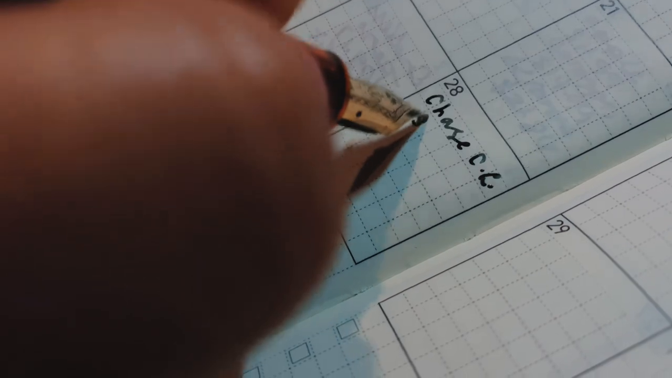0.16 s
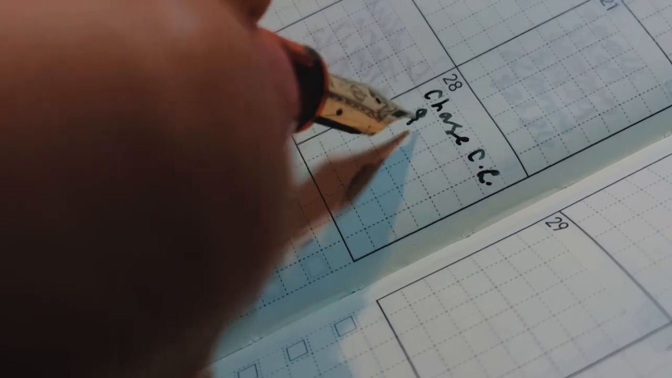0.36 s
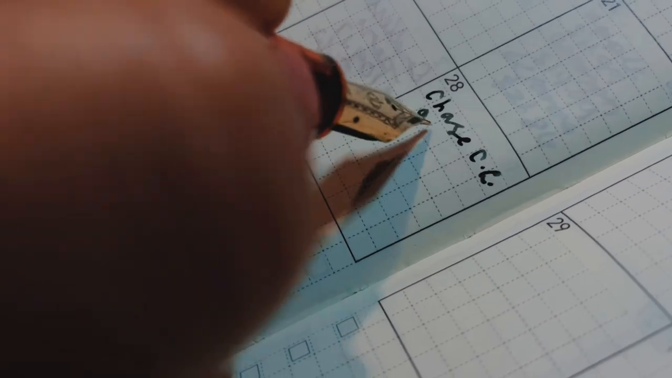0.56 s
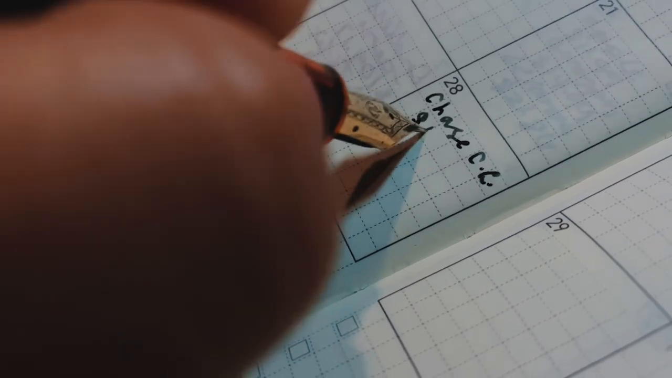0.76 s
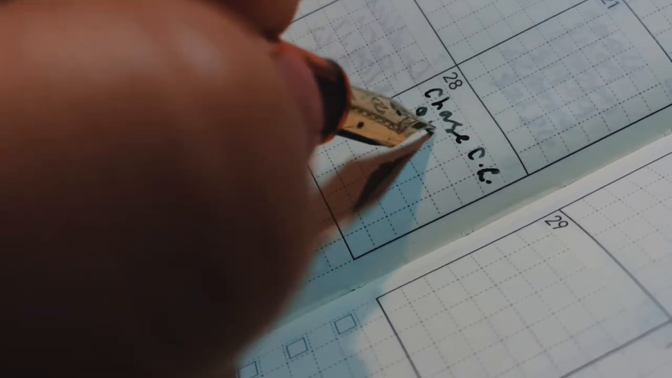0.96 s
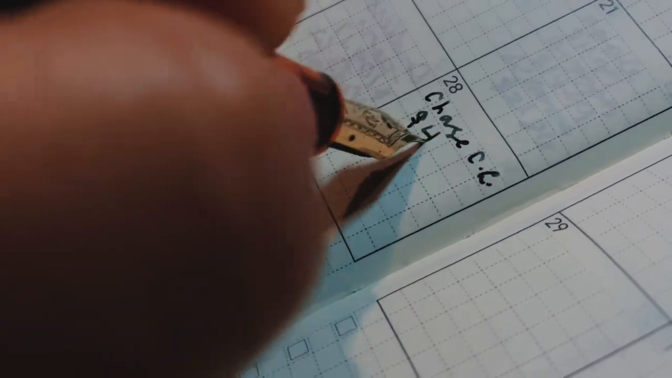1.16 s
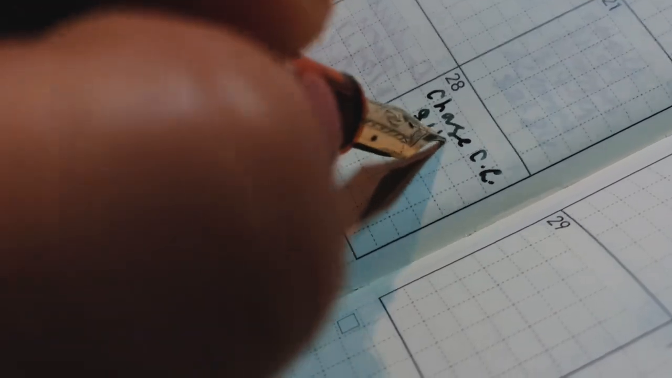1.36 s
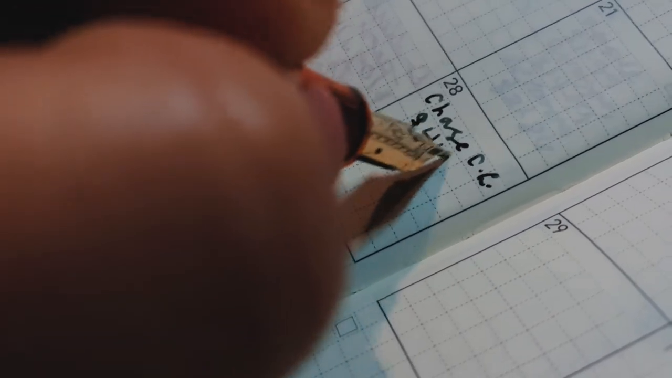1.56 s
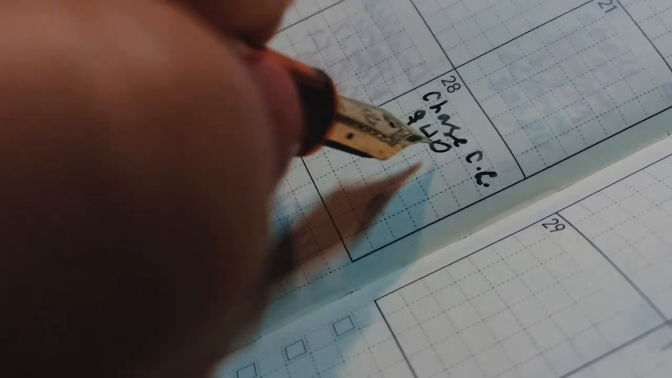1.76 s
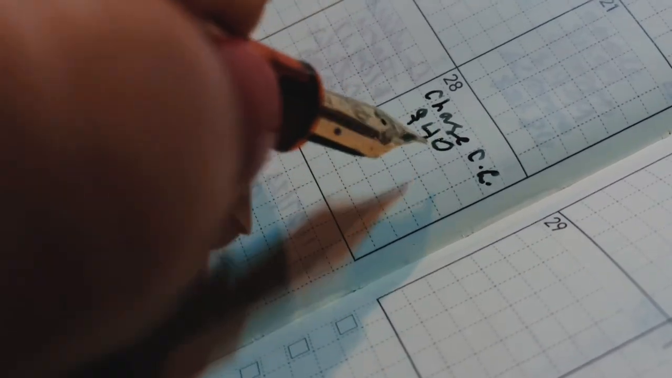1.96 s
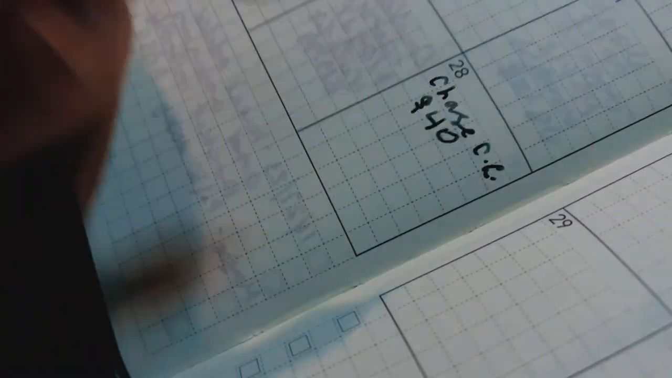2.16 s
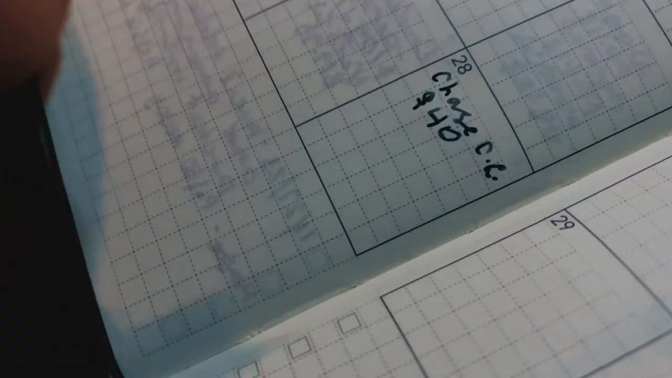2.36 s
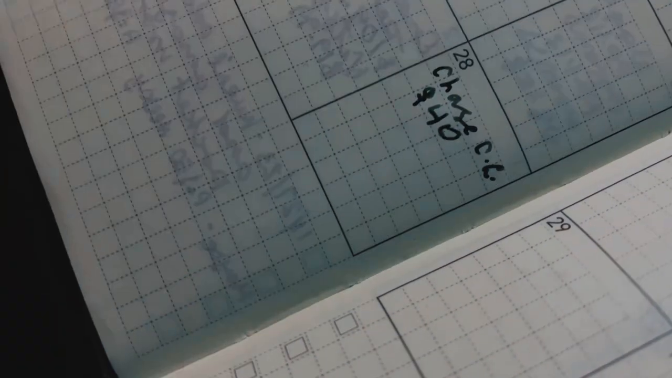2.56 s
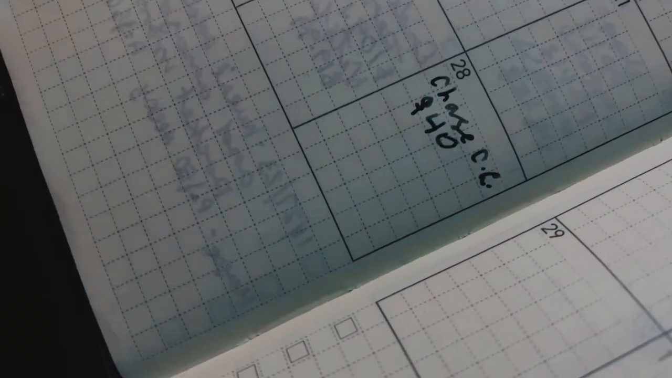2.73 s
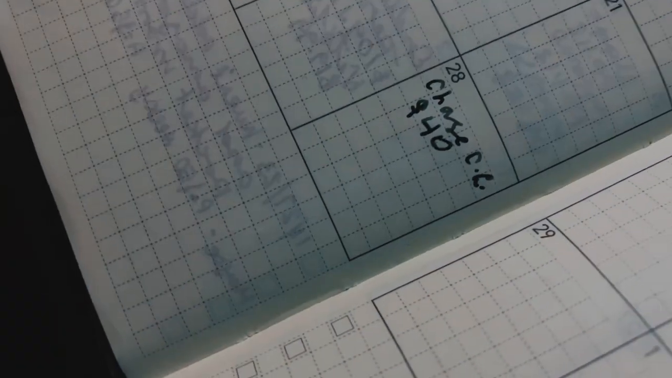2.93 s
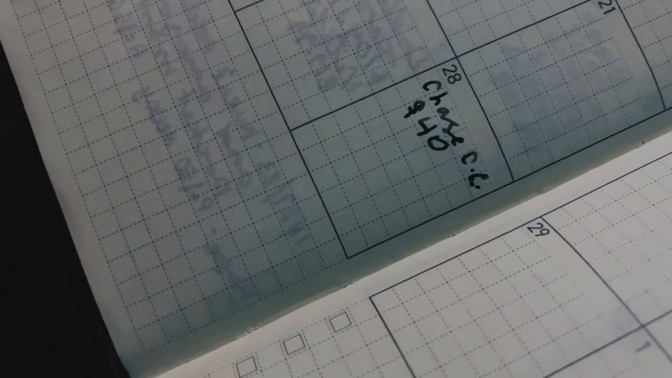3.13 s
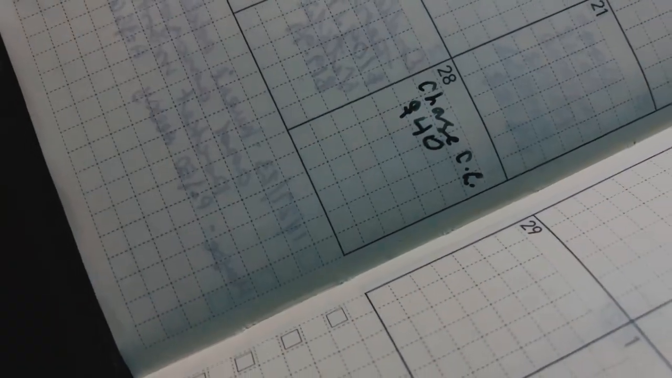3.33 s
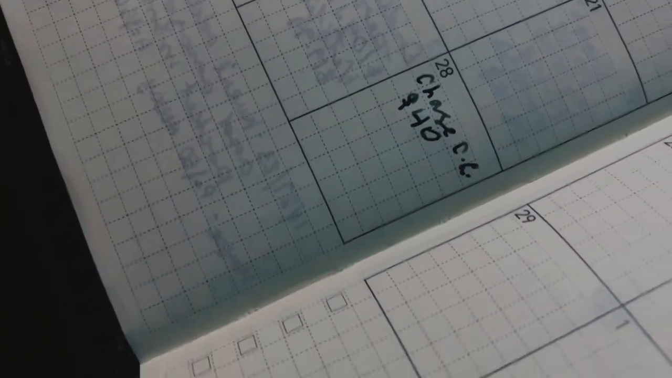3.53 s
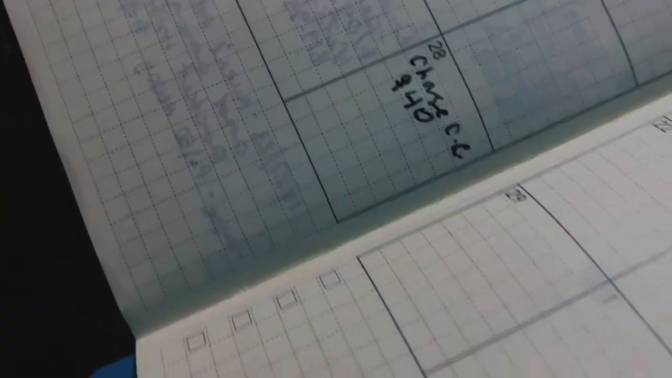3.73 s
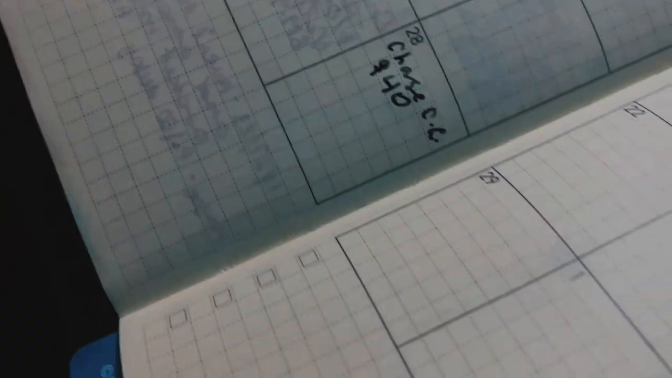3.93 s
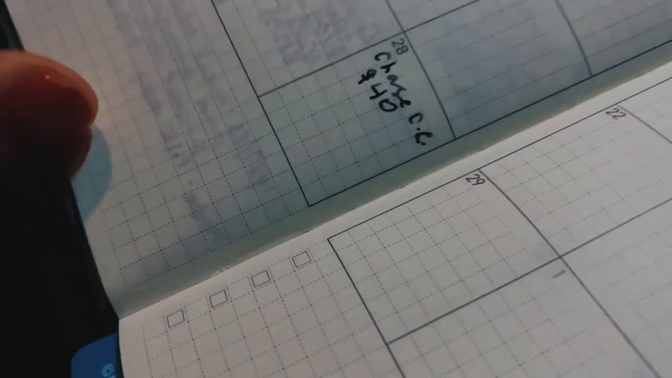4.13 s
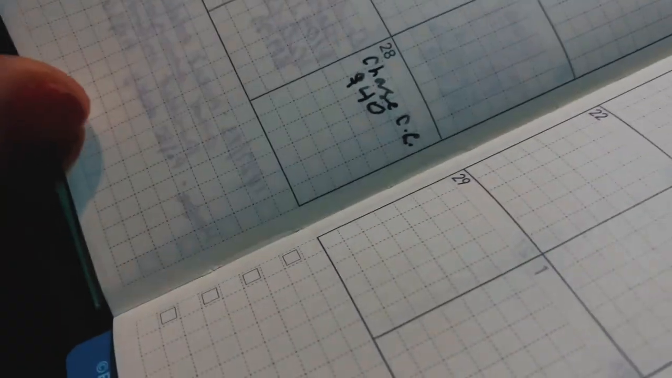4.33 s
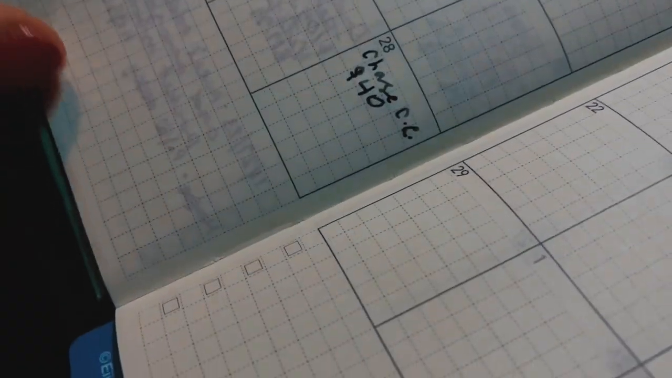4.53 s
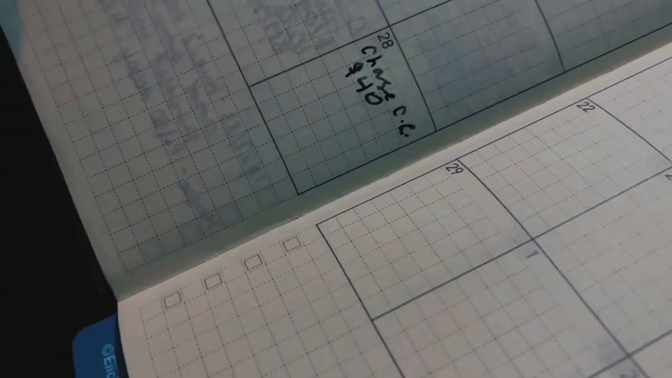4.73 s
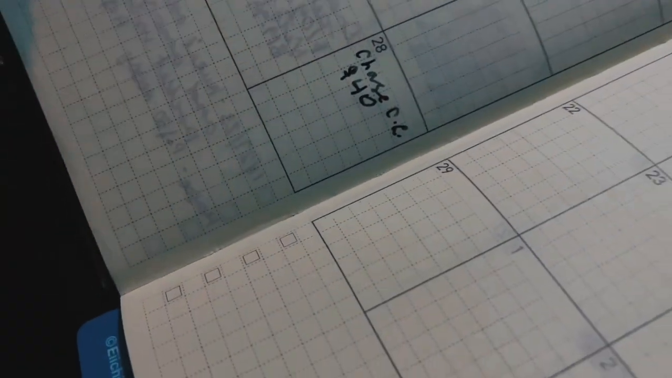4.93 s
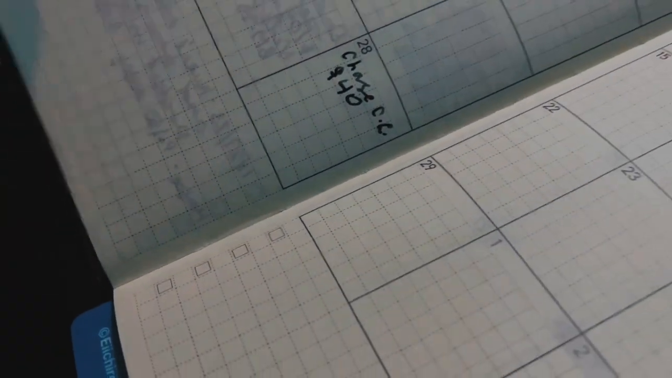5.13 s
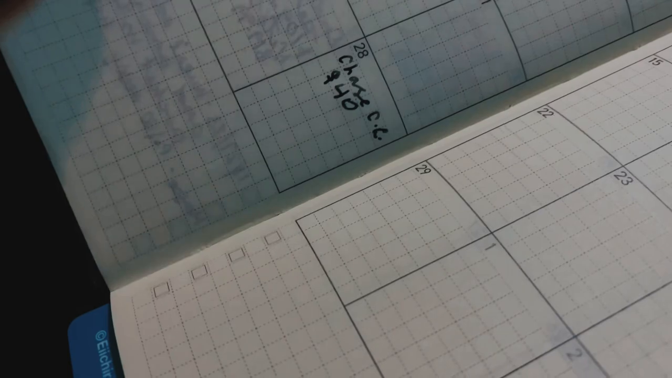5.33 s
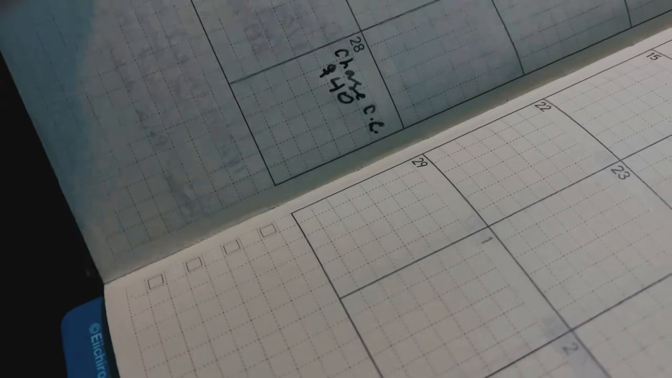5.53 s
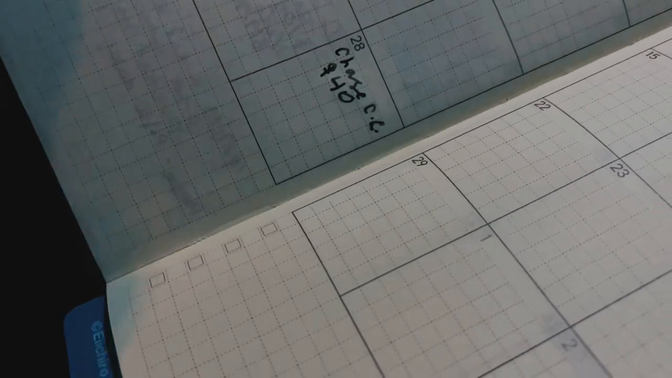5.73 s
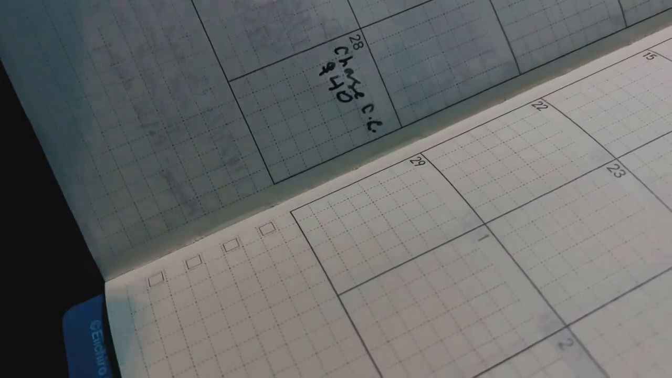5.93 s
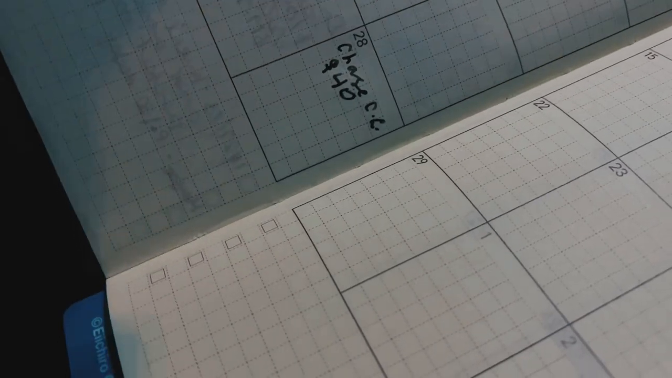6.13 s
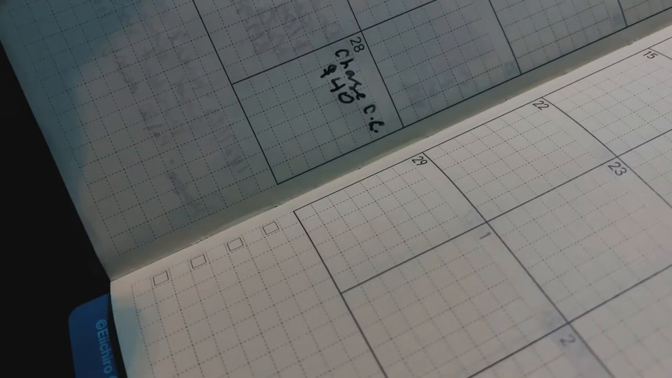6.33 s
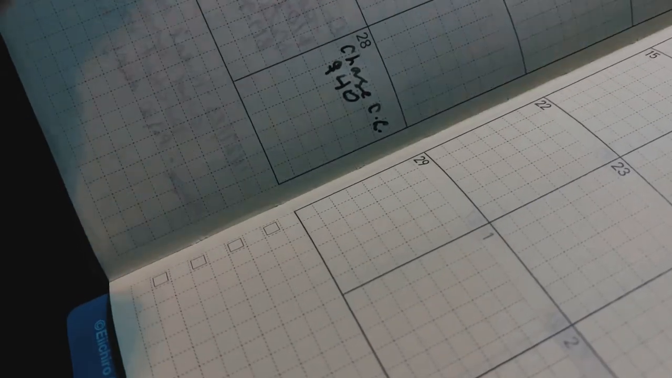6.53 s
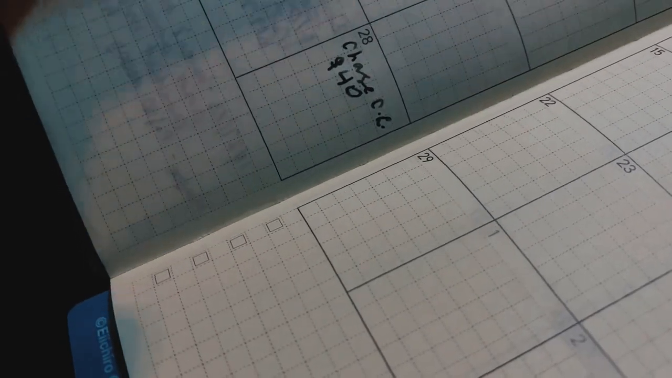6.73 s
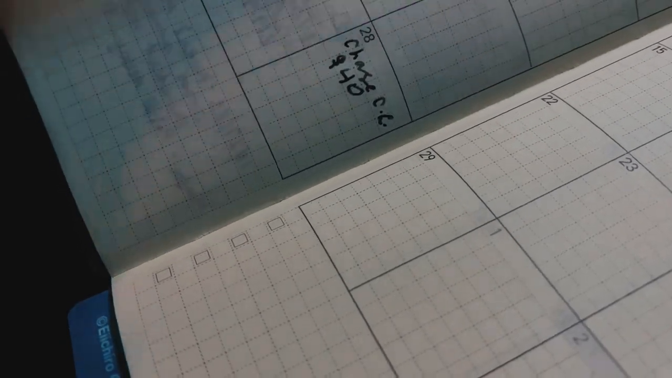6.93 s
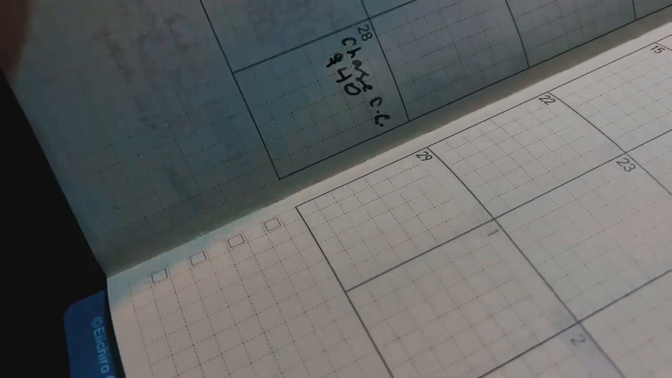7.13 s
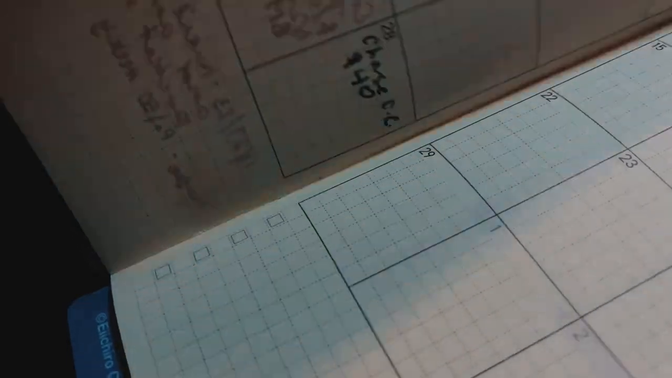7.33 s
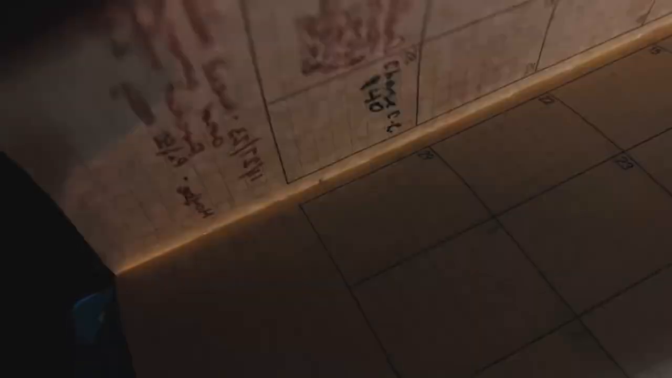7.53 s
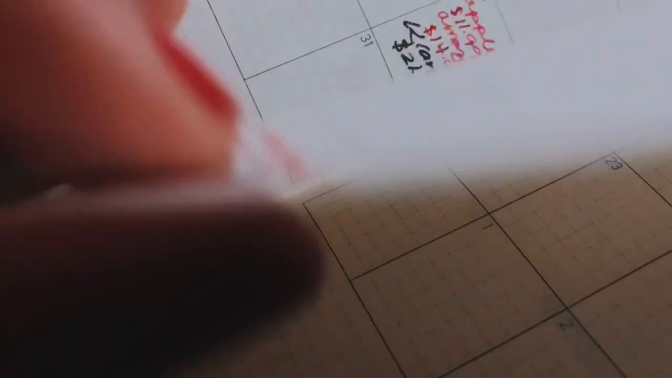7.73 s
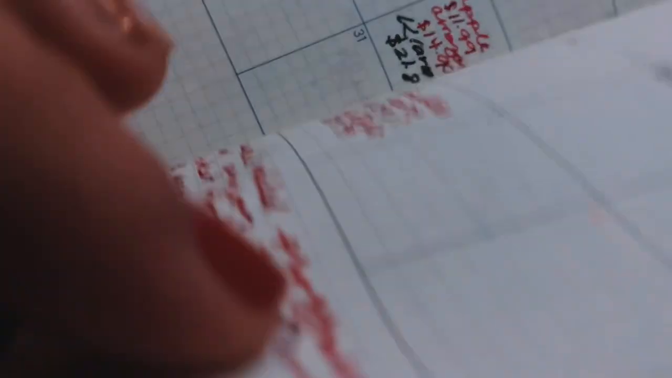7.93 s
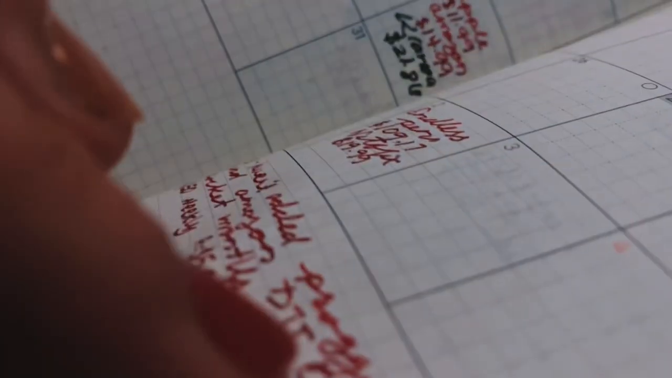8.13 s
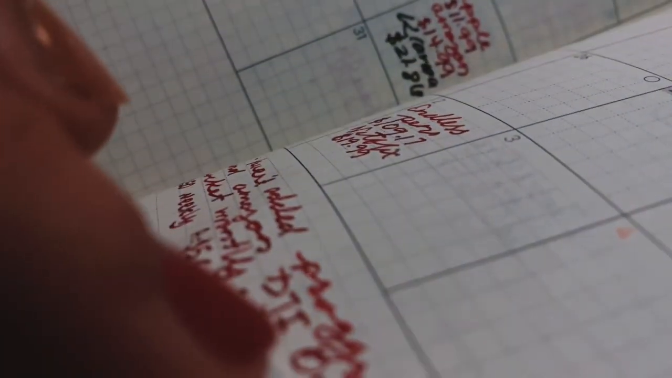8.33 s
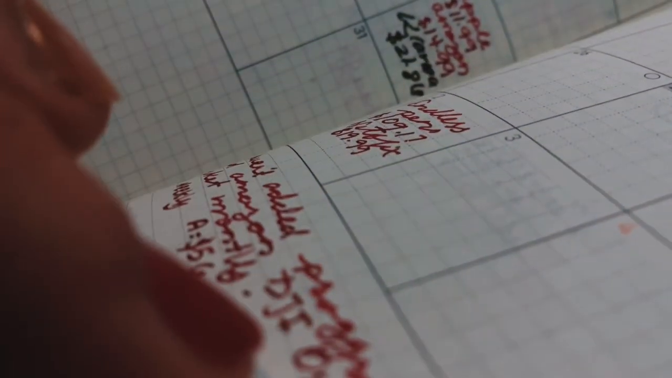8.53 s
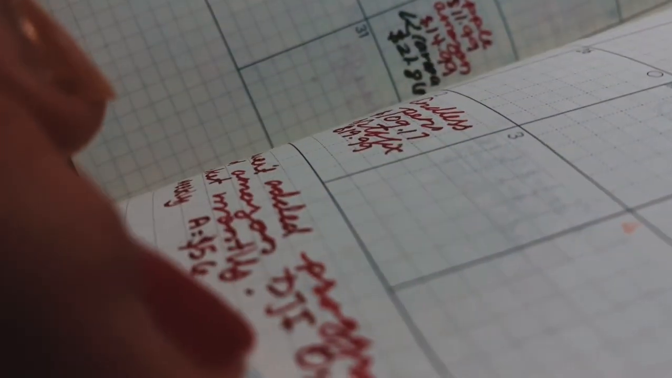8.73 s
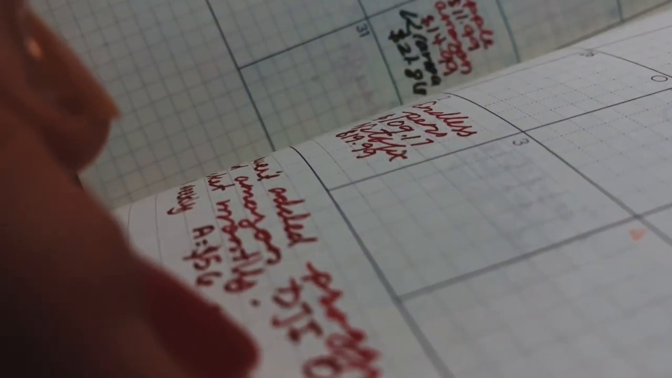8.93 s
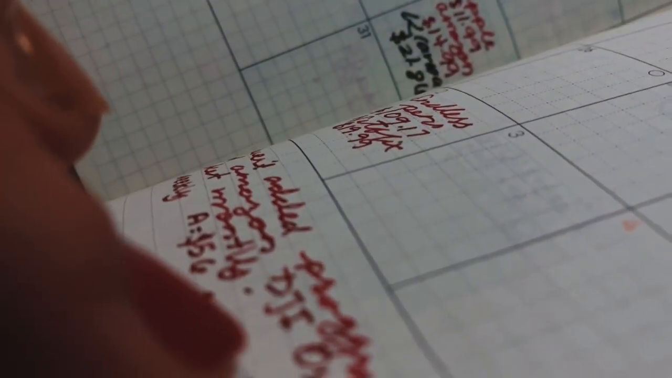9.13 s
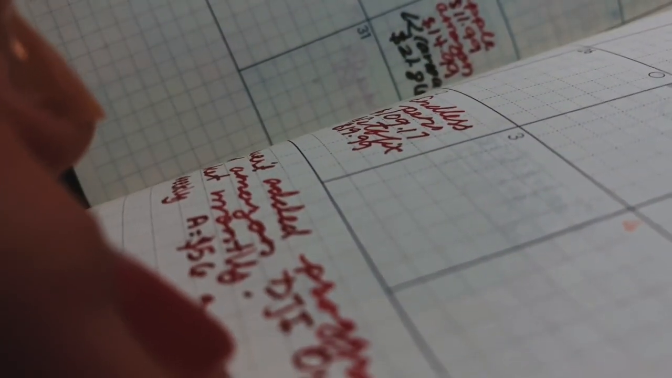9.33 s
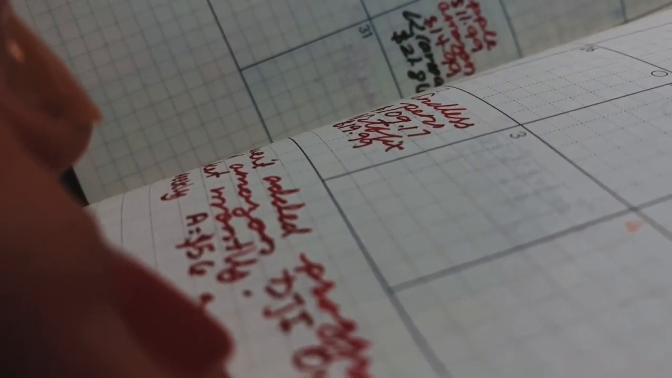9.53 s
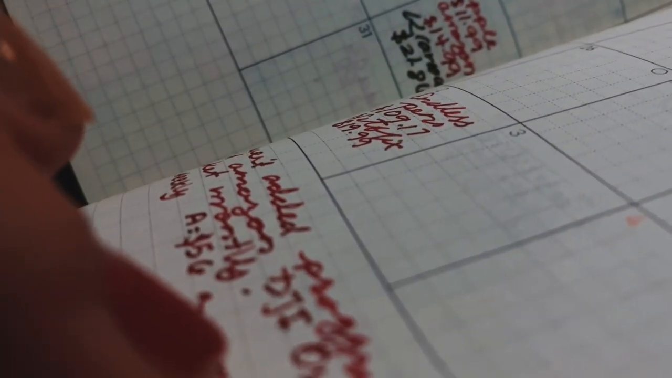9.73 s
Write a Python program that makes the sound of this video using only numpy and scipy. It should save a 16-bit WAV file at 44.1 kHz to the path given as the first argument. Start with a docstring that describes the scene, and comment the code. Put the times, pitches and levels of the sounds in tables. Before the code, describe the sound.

A small ventilated room, microphone very close to a paper planner: steady low hum, soft air and an almost inaudible high whine throughout. From 0.1 to 1.7 s a fountain pen makes short, dry, ringing scratches, singly and then in a quick cluster from 1.35, with tiny ticks. Around 2.0-2.2 the nib lifts with clicks and a dull bump. Only room tone until 4.0, when a faint rub and bump begin, then a crisp tick at 4.2. From 4.4 to 6.5 fingers slide on page edges in uneven crackly rustles, strongest near 5.55. A hard tick and thud land at 6.55. From 6.7 to 8.0 the page turns with brisk rubs, ticks, papery buckling pops at 6.9, 7.1, 7.3 and 7.5, and soft bumps. Light creaks follow; at 8.46 the held sheet snaps, by far the loudest sound, then faint creaks until nearly 9.8.

```python
"""At a desk in a small ventilated room, microphone close to a paper planner: a fountain pen writes short strokes.
Paper fibres pluck the nib, and its modes ring according to the direction of the stroke.
Fingers slide along page edges as filtered crackle; sharp ticks, creaks and soft bumps are short noise bursts.
A sheet buckles with dispersing bending waves, and the held page gives one loud snap near the end.
Behind it lie broadband air, hum and duct resonances of shaped noise, and a faint steady whine."""
import sys
import numpy as np
from scipy import signal
from scipy.fft import rfft, irfft, next_fast_len
from scipy.io import wavfile
from scipy.ndimage import map_coordinates

SR = 44100
rng = np.random.default_rng(int(sys.argv[2]) if len(sys.argv) > 2 else 0)


def inscribe(sig):
    """Save sig as 16-bit PCM at rate SR to the path in sys.argv[1].

    A 1-D sig is mono; a 2-D sig holds one channel per row.
    Samples are clipped to [-1, 1] before scaling.
    """
    pcm = np.round(np.clip(np.atleast_2d(sig).T, -1, 1) * 32767)
    wavfile.write(sys.argv[1], SR, pcm.astype(np.int16))


N = 436129


def amp(db):
    """Decibels to gain."""
    return 10 ** (np.asarray(db) / 20)


def unit(x):
    """Scaled to rms 1."""
    return x / np.sqrt(np.mean(x ** 2) + 1e-20)


def along(points, hz):
    """(f/Hz, level/dB) points read on a log frequency axis."""
    f, v = np.transpose(points)
    return np.interp(np.log(hz + 1), np.log(f + 1), v)


def filtered(x, response):
    """x shaped by a response of frequency, padded so that its tail does not wrap round."""
    size = next_fast_len(len(x) + 8192)
    spectrum = rfft(x, size) * response(np.fft.rfftfreq(size, 1 / SR))
    return irfft(spectrum, size)[:len(x)]


def resonance(f, hz, width):
    """Causal response of one damped mode, gain 1 at its peak."""
    return 1j * f * width / (hz * hz - f * f + 1j * f * width)


def body(modes, f):
    """Gain of a set of modes added in power, with deep valleys between them."""
    powers = (amp(2 * db) * np.abs(resonance(f, hz, width)) ** 4 for hz, width, db in modes)
    return np.sqrt(sum(powers))


def wobble(rate, size):
    """A smooth random curve, rate knots a second."""
    knots = rng.standard_normal(4096)
    return map_coordinates(knots, [np.arange(size) * rate / SR], mode="wrap")


def add(track, s, sound):
    """Mix a sound in at time s, cut off where the track ends."""
    room = track[max(round(s * SR), 0):][:len(sound)]
    room += sound[:len(room)]


def drifting(x, depth_db, width_hz, hold_s):
    """Narrow resonances that come and go as the contact moves over the sheet."""
    hz, s, z = signal.stft(x, SR, nperseg=512)
    knots = rng.standard_normal((128, 64))
    grid = np.meshgrid(hz / width_hz, s / hold_s, indexing="ij")
    field = map_coordinates(knots, grid, mode="wrap")
    return signal.istft(z * amp(depth_db * field), SR, nperseg=512)[1][:len(x)]


def fibres(rate, spread_db, smooth):
    """One second of paper fibres catching and letting go, over a smoother rub."""
    caught = rng.random(SR) < rate / SR
    strength = amp(max(spread_db, 0) * np.clip(rng.standard_normal(SR), -2, 2))
    slips = caught * rng.standard_normal(SR) * strength
    return unit(unit(slips) + smooth * rng.standard_normal(SR))


# nib strokes, close to the microphone: start t/s, end t/s, level/dB, sideways share 0-1
NIB_STROKES = [(0.129, 0.249, -44.3, 0), (0.668, 0.74, -47, 0.05), (0.747, 0.85, -53.5, 0.54),
               (1.032, 1.118, -41, 0.04), (1.359, 1.435, -45, 0.03), (1.415, 1.536, -49, 0.4),
               (1.499, 1.59, -45, 0), (1.587, 1.665, -51.5, 0.97)]
# modes of the nib pulled along its slit, before pressure retunes them: f/Hz, width/Hz, relative level/dB
NIB_ALONG_SLIT = [(1040, 490, -1.5), (1600, 440, 1), (3140, 780, -2), (4070, 550, -1), (4580, 800, -5.5),
                  (6500, 2100, -13), (8000, 860, -19), (10070, 1200, -18), (13900, 1600, -25),
                  (15700, 1000, -21)]
# modes of the nib pushed sideways, same columns: f/Hz, width/Hz, relative level/dB
NIB_SIDEWAYS = [(1110, 360, -2.5), (1770, 520, 1.5), (3350, 600, -13), (4360, 2500, -14.5),
                (5660, 2000, -13), (8300, 1500, -10.5), (10300, 970, -15), (14100, 2100, -17)]


def pen():
    """Fibres pluck the nib; the direction of the stroke decides which of its modes ring."""
    out, t = np.zeros(N), np.arange(SR) / SR
    for start, end, db, sideways in NIB_STROKES:
        share = np.clip(sideways, 0, 1)
        # pressure retunes the nib a little, and the page reflects its sound after a short path
        pressure = 1 + 0.0081 * rng.standard_normal()
        path_s = rng.uniform(0.00105, 0.003)
        page = lambda f: 1 + 0.48 * np.exp(-2j * np.pi * f * path_s)

        def scratch(modes):
            """Plucked fibres heard through the nib's modes and the page's reflection."""
            plucks = fibres(rate=3000, spread_db=1.0, smooth=0.8)
            return unit(filtered(plucks, lambda f: body(modes, f / pressure) * page(f)))

        nib = np.sqrt(1 - share) * scratch(NIB_ALONG_SLIT) + np.sqrt(share) * scratch(NIB_SIDEWAYS)
        nib = unit(drifting(nib, depth_db=1.5, width_hz=295, hold_s=0.039))
        progress = np.clip(t / (end - start), 0, 1)
        swell = np.abs(np.sin(np.pi * progress)) ** 0.67
        level = amp(db + 0.75 * wobble(113, SR))
        add(out, start, level * swell * nib)
    return out


# skin and paper sliding on paper: start t/s, length/s, share of the length spent speeding up 0-1, level/dB
PAGE_SLIDES = [(3.997, 0.19, 0.06, -57.5), (4.438, 0.44, 0.33, -49.5), (5.029, 0.15, 0.19, -42.5),
               (5.125, 0.23, 0.48, -56), (5.259, 0.11, 0.77, -49), (5.372, 0.13, 0.4, -48),
               (5.498, 0.029, 0.7, -42.5), (5.539, 0.019, 0.5, -35.5), (5.558, 0.1, 0.78, -36.5),
               (5.676, 0.087, 0.2, -50), (5.917, 0.067, 0.08, -38.5), (5.97, 0.13, 0, -63.5),
               (6.189, 0.12, 0.23, -47.5), (6.354, .11, 0.5, -57.5), (6.472, 0.094, 0.65, -42),
               (6.723, 0.14, 0.9, -61), (6.799, 0.11, 0.31, -37.5), (6.892, 0.073, 0.35, -45.5),
               (6.952, 0.13, 0.58, -45), (7.157, 0.18, 0.05, -47), (7.302, 0.14, 0.67, -48),
               (7.4, 0.35, 0.35, -56.5), (7.653, 0.068, 0.6, -52), (7.741, 0.063, 0.25, -54),
               (7.919, 0.11, 0.19, -44), (8.072, 0.13, 0.7, -58), (8.483, 0.19, 0.06, -57)]
# tone of rubbed paper before the bend is added: f/Hz, relative level/dB
PAPER_TONE = [(760, -9), (1300, -23.5), (1600, -5.5), (3040, -1.5), (4520, -4.5), (8300, -4.5),
              (12400, -16.5), (14800, -9.5), (15900, -16)]
# how the sheet is bent, from page edge drawn up to page laid flat:
# t/s, brightness/(dB per octave), sheet resonance f/Hz, edge resonance f/Hz, edge level/dB
SHEET_BEND = [(4.05, -4.5, 3000, 6500, -11), (4.6, 3.5, 2800, 6400, -0.5), (5.05, 2, 2950, 5600, -13),
              (5.63, -1, 3130, 5200, -5), (5.92, 4, 2860, 4130, -1), (6.23, -5.5, 3000, 5000, -21),
              (6.53, -3.5, 4630, 8150, -7), (6.85, 1, 2640, 6100, -15), (7.03, 2, 5200, 6500, -6),
              (7.17, 0.5, 3160, 4800, -8), (7.53, -.5, 3200, 6200, -21), (7.7, -5, 2530, 3300, -29),
              (7.94, -4.5, 1970, 4400, 2), (8.5, -8, 2600, 4400, -8)]
SHEET_DB, SHEET_WIDTH_HZ, EDGE_WIDTH_HZ = -1, 1760, 1000  # the sheet and its free edge sing under the rubbing
SLIP_DB, SLIPS_PER_S = 2, 61  # the sliding finger catches and hurries unevenly
CLUMP_DB, CLUMPS_PER_S = -0.6, 340  # fibres let go in small crackling clumps
SLIDE_SWELL = 0.72  # power of speed giving loudness in a 0.1 s slide; longer slides swell more gradually


def slides():
    """Each slide speeds up and slows; fibres let go in clumps, and the sheet's resonances shift as it bends."""
    out, t = np.zeros(N), np.arange(SR // 2) / SR
    times, *shape = np.transpose(SHEET_BEND)
    for start, length, rising, db in PAGE_SLIDES:
        rise = length * np.clip(rising, 0.01, 0.99)
        bend = (np.interp(start + rise, times, column) for column in shape)
        bright_db, sheet_hz, edge_hz, edge_db = bend

        def paper(f):
            """Gain of the rubbed paper, tilted by the bend about 4 kHz."""
            tilt_db = bright_db * np.log2(np.clip(f, 1500, 5600) / 4000)
            low_mode = amp(-0.5) * np.abs(resonance(f, 840, 310)) ** 2
            return amp(along(PAPER_TONE, f) + tilt_db) + low_mode

        def singing(f):
            """Gain of the ringing sheet and its free edge."""
            sheet = amp(SHEET_DB) * np.abs(resonance(f, sheet_hz, SHEET_WIDTH_HZ)) ** 2
            edge = amp(edge_db) * np.abs(resonance(f, edge_hz, EDGE_WIDTH_HZ)) ** 2
            return sheet + edge

        clumps = amp(CLUMP_DB * wobble(CLUMPS_PER_S, len(t)))
        grain = fibres(rate=3000, spread_db=3.5, smooth=1.0)[:len(t)] * clumps
        rub = filtered(grain, lambda f: paper(f) + singing(f))
        rub = unit(drifting(rub, depth_db=1.0, width_hz=259, hold_s=0.0347))
        speed = np.sin(np.pi / 2 * np.interp(t, [0, rise, length], [0, 1, 0]))
        swell = speed ** (SLIDE_SWELL * np.sqrt(10 * length))
        level = amp(db + SLIP_DB * wobble(SLIPS_PER_S, len(t)))
        add(out, start, level * swell * rub)
    return out


# the sheet buckles: t/s, peak level of the crease/dB, pitch f/Hz, top f/Hz,
# delay of the bending wave per unit of path at 1 kHz/ms
SHEET_SNAPS = [(6.888, -21.5, 930, 2330, 0.85), (7.074, -23, 1980, 5200, 0.62),
               (7.3137, -17, 2770, 6800, 0.66), (7.4795, -24.5, 2670, 6130, 1.34),
               (7.659, -33, 1940, 3580, 1.1), (8.459, -5, 1670, 14100, 0.63)]
# the stack of pages, shaken: f/Hz, relative level/dB, t60/s
BOOK_MODES = [(151, -5, 0.11), (204, -4.5, 0.076), (320, -11.5, 0.11), (448, -5.5, 0.052),
              (636, 2.5, 0.035), (847, 4.5, 0.023)]


def snaps():
    """A buckle sends a bending wave across the sheet, treble first; it returns from the edges and shakes the book."""
    out, t = np.zeros(N), np.arange(SR // 4) / SR
    for s, db, hz, top_hz, travel_ms in SHEET_SNAPS:
        # later returns have mostly come further: more smeared, and with less treble
        paths = 3 + 2.2 * (np.arange(1, 17) + rng.uniform(-0.45, 0.45, size=16))
        signs = rng.choice([-1, 1], size=len(paths))
        wave = lambda f, path: np.exp(-4j * np.pi * travel_ms * path * np.sqrt(f / 1000))
        loss = lambda f, path: np.exp(-path * (0.08 + f / 250000))
        returns = lambda f: sum(sign * wave(f, path) * loss(f, path) for sign, path in zip(signs, paths))
        # the harder the snap, the more it reaches the edges and moves the book
        reach = amp(0.5 * db)
        crease = lambda f: resonance(f, hz, 1.23 * hz) / (1 + (f / top_hz) ** 4)
        snap = filtered(t == 0, lambda f: crease(f) * (wave(f, 0.945) + reach * returns(f)))
        book = sum(amp(level - 60 * t / t60) * np.sin(2 * np.pi * mode_hz * t)
                   for mode_hz, level, t60 in BOOK_MODES)
        shake = amp(-9.0) * reach * book * (1 - np.exp(-t / 0.0031))
        add(out, s, amp(db) * (snap / np.abs(snap).max() + shake))
    return out


PAGE_HZ, PAGE_WIDTH_HZ, PAGE_DB = 1310, 710, -24  # every touch also taps the sheet beneath it


def touch(hz, t60, top_db):
    """A noise burst of tiny slips that dies at once, peak 1; a higher pitch brings more sparkle at the top."""
    t = np.arange(SR // 4) / SR
    burst = rng.standard_normal(len(t)) * amp(-60 * t / t60) * (1 - np.exp(-t / (0.036 * t60)))

    def contact(f):
        """Response of the contact, its sparkle and the tapped sheet."""
        sparkle = amp(top_db) * (hz / 4500) ** 2 * resonance(f, 17700, 2500)
        page = amp(PAGE_DB) * resonance(f, PAGE_HZ, PAGE_WIDTH_HZ) ** 2
        return resonance(f, hz, 1.39 * hz) ** 2 + sparkle + page

    tick = filtered(burst, contact)
    return tick / np.abs(tick).max()


# sharp touches of nib, nail and page edge: t/s, peak level/dB, pitch f/Hz, top f/Hz
SHARP_TOUCHES = [(0.094, -45, 3100, 9000), (0.58, -53, 2700, 9000), (0.973, -52, 3300, 9100),
                 (1, -49, 3300, 9000), (1.374, -35, 2500, 5000), (1.697, -49, 4500, 12000),
                 (2.034, -33.5, 3930, 6200), (2.042, -37, 3720, 6140), (2.171, -33, 1330, 6100),
                 (4.226, -25.5, 5060, 15100), (5.036, -32, 4000, 12000), (5.598, -26.5, 3030, 12000),
                 (5.754, -48, 2400, 6000), (6.535, -21, 4330, 12000), (6.543, -14, 3830, 12900),
                 (6.555, -24.5, 1820, 4000), (6.8008, -35, 2980, 15000), (6.94, -27, 5600, 11000),
                 (6.952, -34, 5600, 10000), (6.975, -27, 5350, 15000), (7.034, -30, 6000, 12000),
                 (7.297, -36, 7500, 15000), (7.558, -36, 890, 1800)]
TICK_T60_S, TICK_TOP_DB = 0.011, -4.5  # decay, and sparkle for a pitch of 4500 Hz


def ticks():
    """Hard contacts differ in strength, pitch and sharpness, and share one decay time."""
    out = np.zeros(N)
    for s, db, hz, top_hz in SHARP_TOUCHES:
        tick = filtered(touch(hz, TICK_T60_S, TICK_TOP_DB), lambda f: 1 / (1 + (f / top_hz) ** 4))
        add(out, s, amp(db) * tick / np.abs(tick).max())
    return out


# the page creaks under a gripping finger: t/s, peak level before the shared gain/dB
PAGE_CREAKS = [(5.357, -46), (6.1298, -45), (6.229, -35), (6.287, -43), (6.315, -44.5), (7.199, -37),
               (7.272, -42), (7.8191, -42), (7.855, -42), (7.909, -39), (8.0658, -38), (8.267, -47.5),
               (8.304, -43.5), (8.43, -41), (8.688, -50.5), (8.8153, -44), (9.022, -51), (9.1174, -47.5),
               (9.251, -42), (9.563, -48), (9.663, -47.5), (9.709, -46.5), (9.787, -47)]
CREAK_HZ, CREAK_T60_S, CREAK_DB = 2700, 0.037, 4  # pitch, decay and gain shared by all creaks
CREAK_TOP_DB = 3  # sparkle, for a pitch of 4500 Hz
SETTLE_S, SETTLE_DB = 0.028, -8  # the grip gives again, around this much later and weaker


def creaks():
    """Gripped paper gives in two steps, each a touch of the same pitch."""
    out = np.zeros(N)
    creak = lambda db: amp(db) * touch(CREAK_HZ, CREAK_T60_S, CREAK_TOP_DB)
    for s, db in PAGE_CREAKS:
        add(out, s, creak(db + CREAK_DB))
        settle_s = SETTLE_S * rng.uniform(0.9, 1.3)
        add(out, s + settle_s, creak(db + CREAK_DB + SETTLE_DB))
    return out


# soft bumps of hand and page on the book: t/s, peak level/dB, pitch f/Hz, t60/s
BOOK_BUMPS = [(2.134, -32, 75, 0.44), (4.031, -33.5, 70, 0.16), (5.028, -36, 123, 0.25),
              (5.52, -36.5, 104, 0.31), (6.534, -28, 760, 0.065), (6.546, -21.5, 94, 0.11),
              (6.559, -21.5, 193, 0.058), (6.571, -30, 113, 0.06), (7.482, -27.5, 139, 0.22),
              (7.558, -32, 232, 0.23), (7.73, -34.5, 294, 0.12)]


def bumps():
    """The stack of pages takes a blow with a short, dull flutter of resonant noise."""
    out, t = np.zeros(N), np.arange(SR // 2) / SR
    for s, db, hz, t60 in BOOK_BUMPS:
        dull = lambda f: resonance(f, hz, 0.36 * hz) / (1 + 1j * f / (11.3 * hz))
        flutter = filtered(rng.standard_normal(len(t)), dull)
        bump = flutter * amp(-60 * t / t60) * (1 - np.exp(-t / 0.00042))
        add(out, s, amp(db) * bump / np.abs(bump).max())
    return out


def walls(x, t60):
    """A small room answers with a decaying noise tail, duller towards the treble."""
    t = np.arange(SR // 2) / SR
    decay = rng.standard_normal(len(t)) * amp(-60 * t / t60)
    tail = filtered(decay, lambda f: 1 / (1 + 1j * f / 5000))
    return signal.fftconvolve(x, tail / np.linalg.norm(tail))[:N]


# moving air of the room ventilation: f/Hz, level/dB per Hz
ROOM_AIR = [(25, -72.5), (55, -67), (100, -74.5), (165, -78.5), (220, -75.5), (520, -80), (630, -87),
            (1100, -88.5), (1450, -100), (2200, -103), (3200, -107), (8000, -115), (12500, -120),
            (16000, -122)]
# its hum and duct resonances: f/Hz, width/Hz, level/dB
DUCT_MODES = [(70, 5.8, -56.5), (128.5, 5.4, -67.5), (285, 39, -68.5), (473.7, 70, -59), (845, 746, -60)]
AIR_WAVER_DB = 0.5  # how much the flow of air wavers
WHINE_HZ, WHINE_DB = 8000, -87  # a faint electrical whine


def ventilation():
    """Gently wavering air as shaped noise, hum and duct resonances as narrower noise, and a thin sine whine."""
    flow = np.sqrt(SR / 2) * amp(AIR_WAVER_DB * wobble(5.3, N))  # the root turns dB per Hz into gain
    air = flow * filtered(rng.standard_normal(N), lambda f: amp(along(ROOM_AIR, f)))
    for hz, width, db in DUCT_MODES:
        hum = filtered(rng.standard_normal(N), lambda f: resonance(f, hz, width) ** 2)
        air = air + amp(db) * unit(hum)
    whine = np.sin(2 * np.pi * WHINE_HZ * np.arange(N) / SR)
    return air + amp(WHINE_DB) * whine


def scene():
    """Pen and pages close by, the room behind them."""
    desk = pen() + slides() + ticks() + snaps() + bumps() + creaks()
    return (desk + amp(-14.5) * walls(desk, t60=0.061) + ventilation())[None]


TOP_HZ = 16000  # highest frequency kept


def record(dry):
    """The small microphone loses the deepest bass and dips slightly at 14 kHz; nothing above TOP_HZ is kept."""
    bass_loss = lambda f: f ** 4 / (f ** 4 + 25 ** 4)
    hollow = lambda f: 1 - 0.098 * resonance(f, 14000, 1960)
    return np.array([filtered(x, lambda f: bass_loss(f) * hollow(f) * (f < TOP_HZ)) for x in dry])


dry = scene()
out = record(dry)
inscribe(out)
```